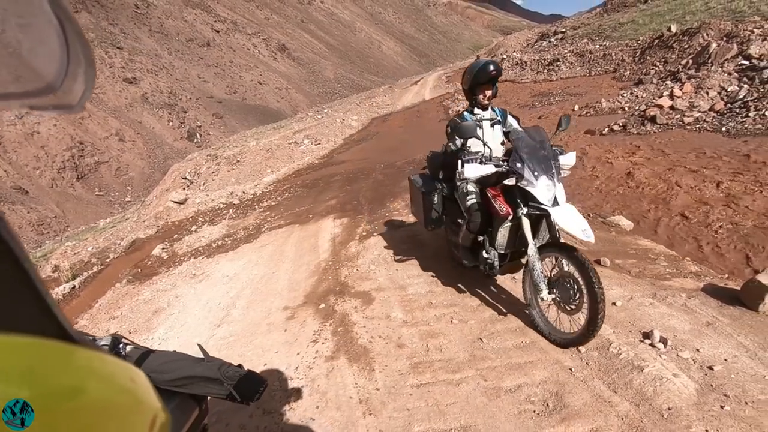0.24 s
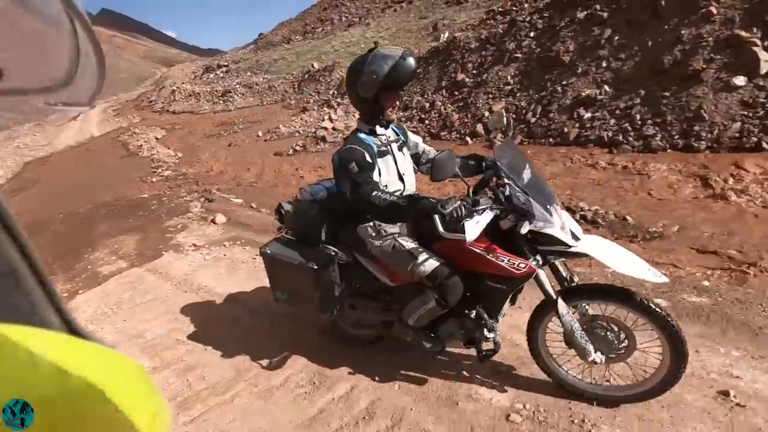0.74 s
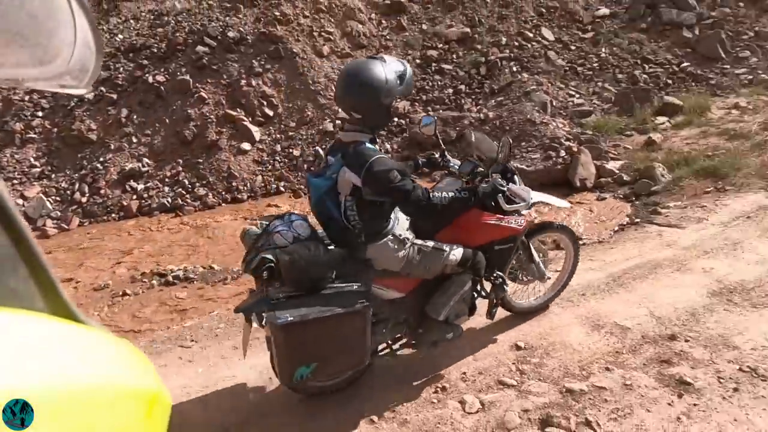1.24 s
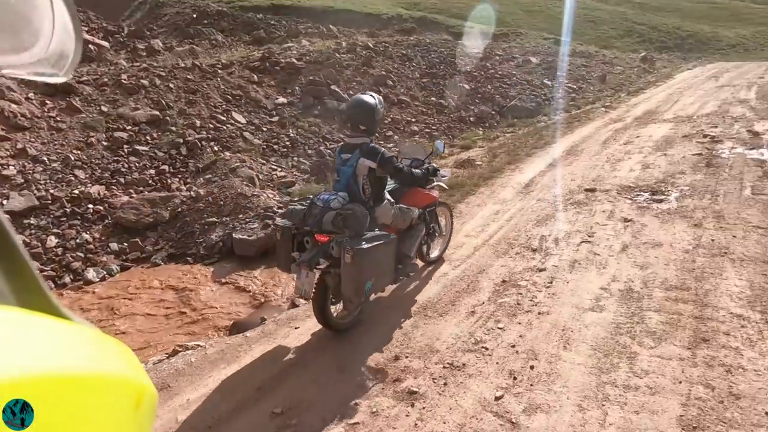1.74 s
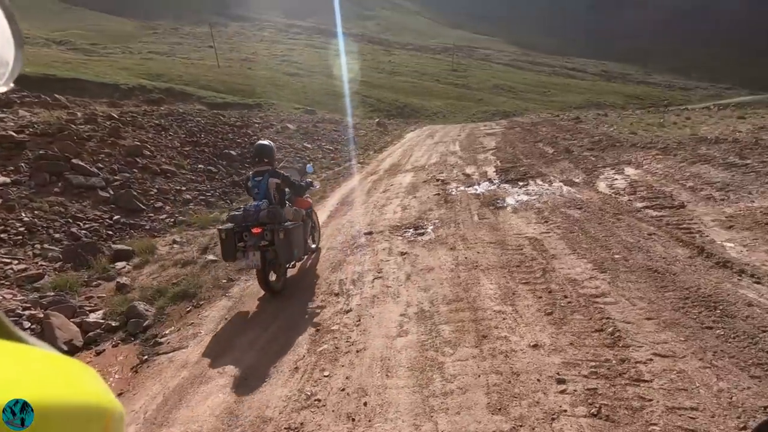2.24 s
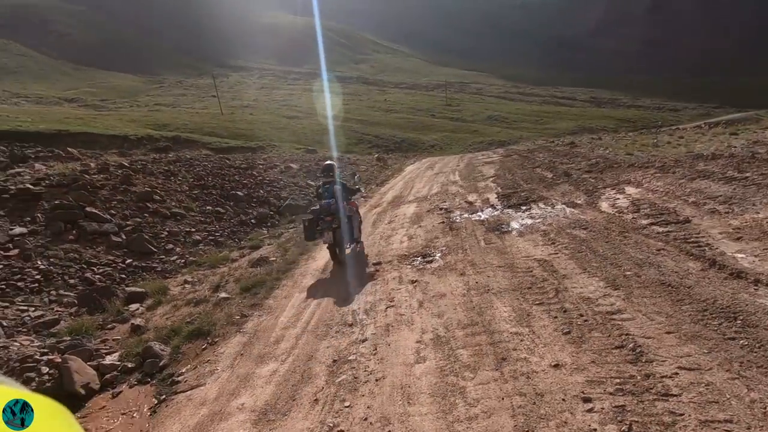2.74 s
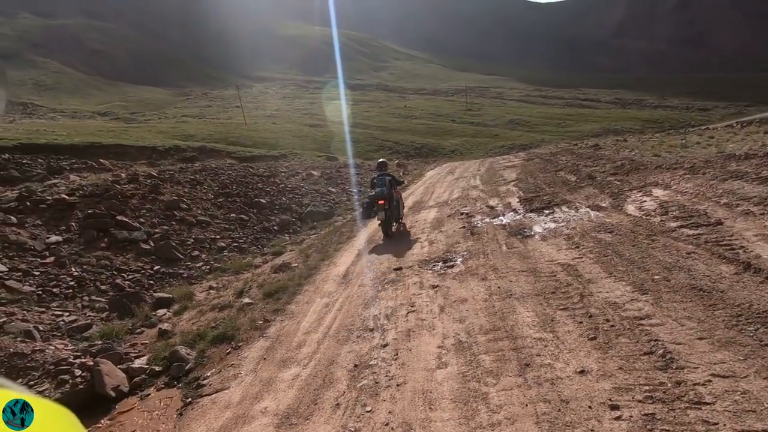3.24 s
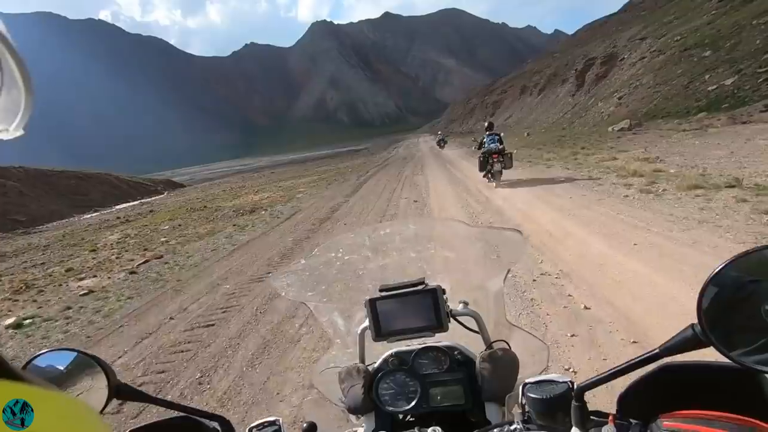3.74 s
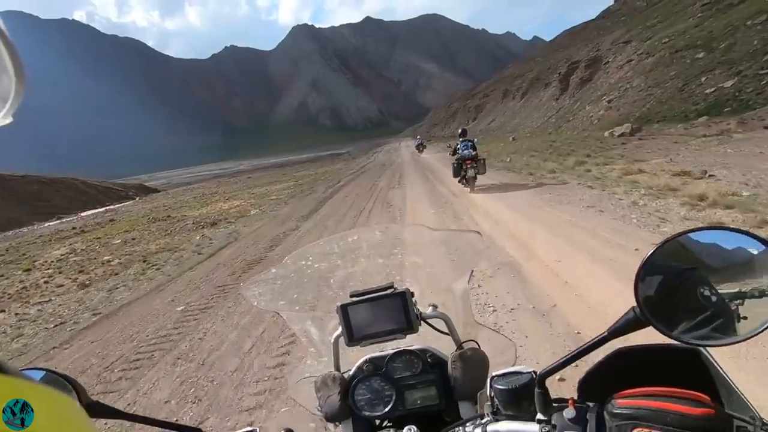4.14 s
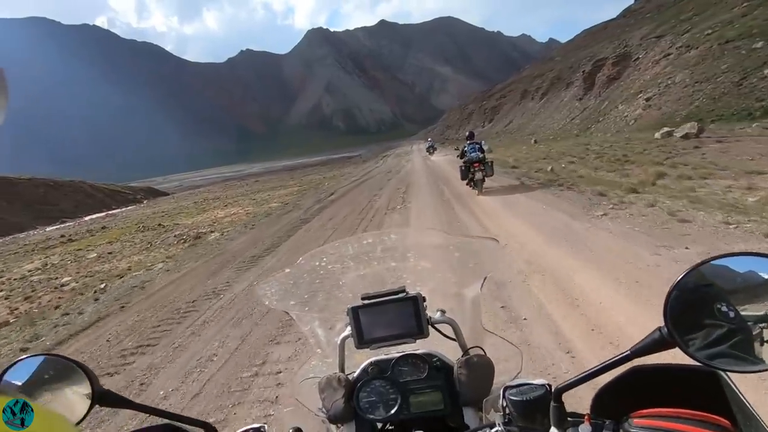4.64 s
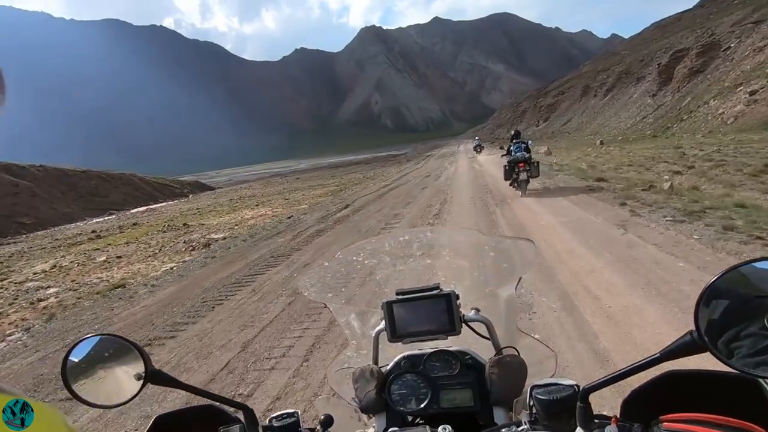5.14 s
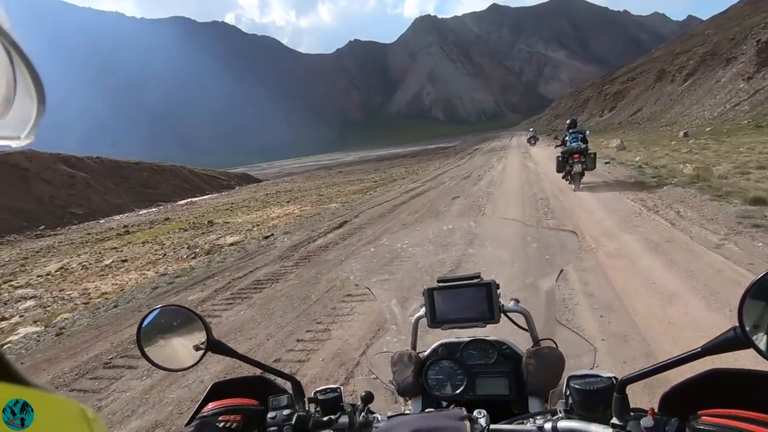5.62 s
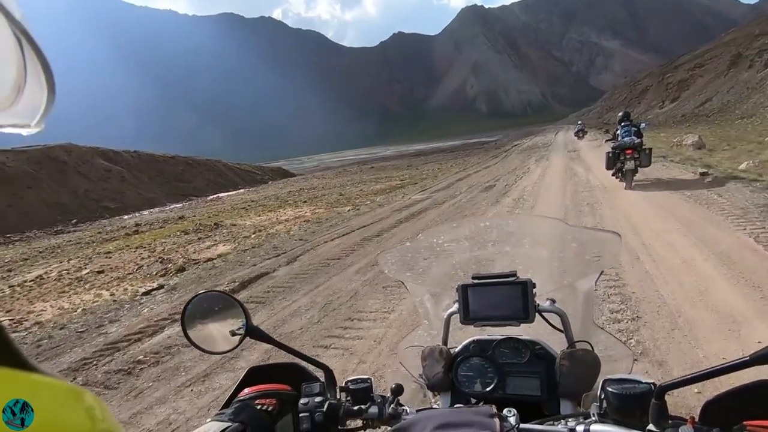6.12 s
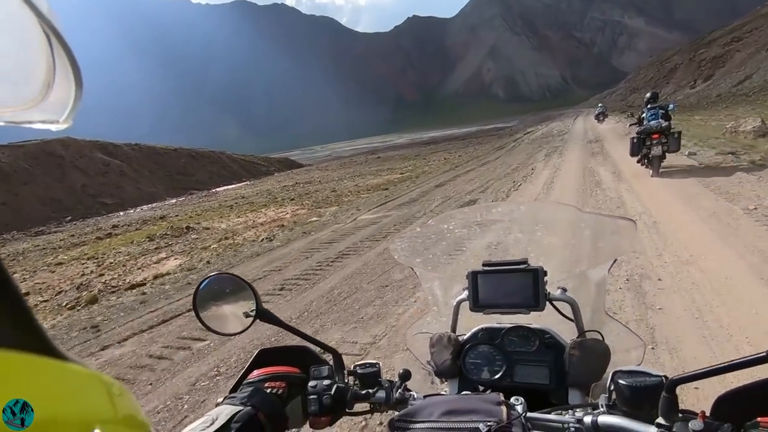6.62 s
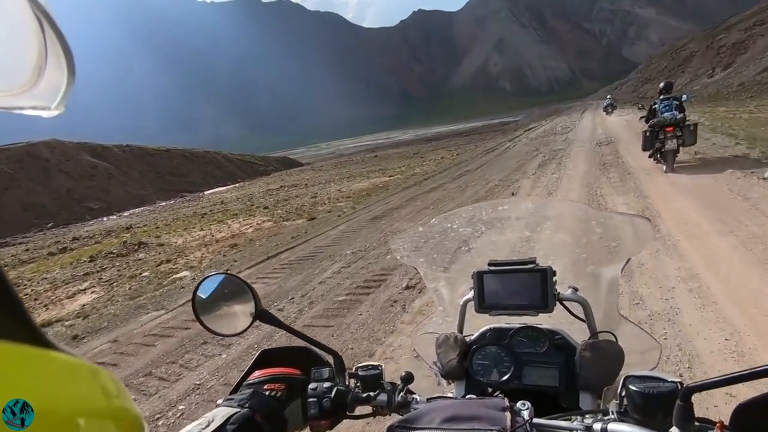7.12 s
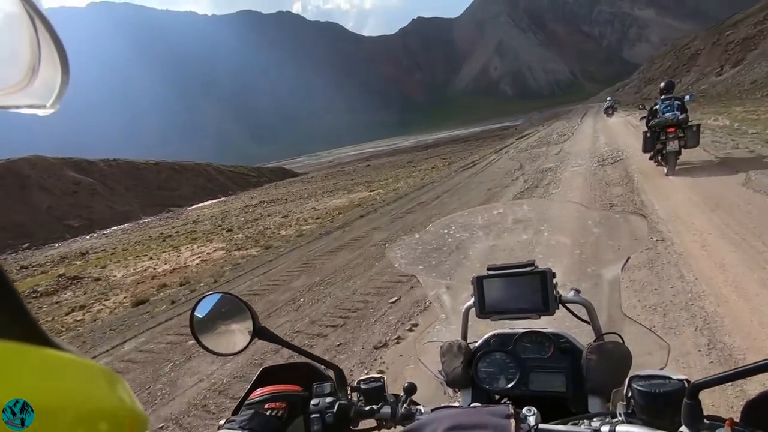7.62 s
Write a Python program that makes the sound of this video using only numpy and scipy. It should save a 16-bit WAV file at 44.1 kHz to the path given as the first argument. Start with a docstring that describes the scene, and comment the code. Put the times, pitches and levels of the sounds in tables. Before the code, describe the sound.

A slow, chugging motorbike passes close by, its valves tapping and chain hissing, then its exhaust spits as it pulls away. Rough helmet rubbing and hollow knocks follow near the microphone. A hard cut brings a steady onboard engine throb with uneven gravel crunch, heavy jolts and ticking fittings, all in open air with low wind buffeting, slightly stronger on the right.

```python
"""A single-cylinder motorcycle thumps past on a dirt track, heard by a helmet camera; the helmet scrapes as the head turns.
Then the camera rides along: its own engine drones, tyres crunch over gravel, the bike knocks and rattles.
Engines are tones and noise bursts timed by an engine cycle; gravel, background roar and wind are uneven noise.
Knocks are short hits that ring or colour noise. Wind buffets the camera throughout."""
import sys
import numpy as np
from scipy import signal
from scipy.fft import rfft, irfft, next_fast_len
from scipy.io import wavfile
from scipy.ndimage import uniform_filter1d, map_coordinates

SR = 44100
rng = np.random.default_rng(int(sys.argv[2]) if len(sys.argv) > 2 else 0)


def output_pcm(signal):
    """Save a mono or channel-first signal as 16-bit PCM at the path in sys.argv[1].

    Samples are clipped to [-1, 1] before scaling.
    """
    pcm = np.clip(np.atleast_2d(signal).T, -1, 1) * 32767
    wavfile.write(sys.argv[1], SR, np.round(pcm).astype(np.int16))


N = 347067

RIDE_S = 3.71  # the ride begins (s)
# The ring of the camera housing, as a colour for hiss. Each row: frequency in Hz, relative level in dB.
HOUSING_COLOUR = [(1750, 8.5), (1960, 14.5), (2250, -3.5), (2950, 5.5), (4300, -12.5), (5900, -7.5),
                  (6550, 2.5), (7200, -12.5), (8500, -23)]
# How stony the track is under the own tyres. Each row: time in seconds, stoniness in dB.
STONINESS = [(3.9, -1), (4.4, 1), (5, 2.5), (5.7, -2.5), (6.4, 2), (6.75, 0), (7.2, 4), (7.87, -1)]


def amp(db):
    """Turn decibels into a gain."""
    return 10 ** (np.asarray(db) / 20)


def unit(x):
    """Scale to an average strength (rms) of 1."""
    return x / np.sqrt(np.mean(x ** 2) + 1e-20)


def clock():
    """Time of each sample in seconds."""
    return np.arange(N) / SR


def along(points, hz):
    """Read (Hz, value) points at any frequency, on a log axis."""
    f, v = np.transpose(points)
    return np.interp(np.log(hz + 1), np.log(f + 1), v)


def shape(points):
    """A filter through (Hz, dB) points that falls steeply beyond both ends."""
    lowest, highest = points[0][0], points[-1][0]

    def response(hz):
        low_cut = np.minimum(1, hz / lowest) ** 4
        high_cut = np.maximum(1, hz / highest) ** 6
        return amp(along(points, hz)) * low_cut / high_cut
    return response


def resonances(modes):
    """A filter that rings at each (Hz, width Hz, dB) mode; neighbours have opposite signs."""
    def response(f):
        total = 0
        for k, (centre, width, db) in enumerate(modes):
            damping = 1j * f * width
            total = total + (-1) ** k * amp(db) * damping / (centre * centre - f * f + damping)
        return total
    return response


def curves(rows):
    """Join timed rows by straight lines into one curve for each column after the time."""
    s, *columns = np.transpose(rows)
    return [np.interp(clock(), s, column) for column in columns]


def wobble(rate):
    """A smooth random curve with this many random points a second."""
    knots = rng.standard_normal(int(N * rate / SR) + 4)
    return map_coordinates(knots, [clock() * rate])


def tone(hz):
    """A sine of rms 1 that follows a pitch curve."""
    return np.sqrt(2) * np.sin(2 * np.pi * np.cumsum(hz) / SR)


def swell(s, length):
    """A flat-topped rise and fall that starts at s."""
    return np.exp(-(2 * (clock() - s) / length - 1) ** 4)


def swells(rows):
    """Add up (start s, length s, dB) swells."""
    return sum(amp(db) * swell(s, length) for s, length, db in rows)


def gate(cycle, at, width):
    """A bell-shaped opening once per engine cycle."""
    return np.exp(-(((cycle - at + .5) % 1 - .5) / width) ** 2)


def gates(cycle, rows):
    """Add up (place in cycle, width in cycles, dB) openings."""
    return sum(amp(db) * gate(cycle, at, width) for at, width, db in rows)


def filtered(x, response):
    """Pass x through a response given by frequency."""
    m = next_fast_len(N + SR // 2)
    return irfft(rfft(x, m) * response(np.fft.rfftfreq(m, 1 / SR)), m)[..., :N]


def port_gains(hz):
    """Left and right response of the microphone ports: the helmet shades and delays the left one."""
    # Left against right. Each row: frequency in Hz, left minus right in dB.
    tilt = [(30, -6.5), (90, -3), (160, -2), (300, -5.5), (700, -3), (1200, -4), (1900, -2), (3000, -5),
            (6500, -11), (8500, -2)]
    lag = 0.00017  # the left port hears later (s)
    # half of the contrast goes to each side
    half = amp(along(tilt, hz) / 2) * np.exp(-1j * np.pi * hz * lag)
    return np.array([half, 1 / half])


def rush(response, drive=1):
    """Stereo noise shaped in time by drive and coloured by response, as strong as its drive."""
    # How alike the two ports hear noise. Each row: frequency in Hz, likeness from 0 to 1.
    alike = [(30, .55), (80, .6), (200, .68), (500, .5), (1200, .83), (2000, .7), (5000, .45)]
    a, b = drive * rng.standard_normal((2, N))
    turn = lambda hz: np.arccos(np.clip(along(alike, hz), 0, 1)) / 2
    common = filtered(a, lambda hz: response(hz) * np.cos(turn(hz)))
    apart = filtered(b, lambda hz: response(hz) * np.sin(turn(hz)))
    pair = filtered(np.array([common + apart, common - apart]), port_gains)
    return unit(pair) * np.sqrt(np.mean(np.square(drive)))


def impulses(rows):
    """One single-sample hit for each (s, dB) row."""
    hits = np.zeros(N)
    for s, db in rows:
        hits[round(s * SR)] = amp(db)
    return hits


def blows(rows, t60):
    """Envelope of (s, dB) hits, each falling 60 dB in t60 seconds after a very quick rise."""
    t = np.arange(SR // 4) / SR
    decay = amp(-60 * t / t60) * (1 - np.exp(-t / 0.000088))
    return signal.fftconvolve(impulses(rows), decay)[:N]


def struck(rows, modes):
    """Clean (s, peak dB) knocks that ring (Hz, width Hz, dB) modes."""
    hz = np.arange(SR // 2 + 1)
    softening = (1 + 1j * hz / modes[-1][0]) ** 2
    ring = irfft(resonances(modes)(hz) / softening)
    knock = signal.fftconvolve(impulses(rows), ring[:SR // 2] / abs(ring).max())[:N]
    return filtered(knock, port_gains)


def riding():
    """0 while standing by the track, 1 on the ride."""
    return np.clip((clock() - RIDE_S) / 0.011 + .5, 0, 1)


def turned(shade_db):
    """Gain while the head is turned away: a brief dip, then a steady change until the ride."""
    turn_s, dip_db, dip_s = 2.93, -4, 0.2
    since = np.maximum(clock() - turn_s, 0)
    change_db = shade_db + dip_db * np.exp(-since / dip_s)
    return amp(change_db * np.minimum(since / 0.005, 1) * (1 - riding()))


def path():
    """The passing bike's bearing (-1 coming, 1 going) and its distance (m) on a straight line."""
    nearest_s, speed_m_per_s, miss_m = 1.238, 5.16, 2.21
    travelled = speed_m_per_s * (clock() - nearest_s)
    distance = np.hypot(travelled, miss_m)
    return travelled / distance, distance


def passing(alongside_db, spreading, rear_db):
    """Level (dB) of one sound of the passing bike, from its distance and the way it points."""
    ahead, distance = path()
    miss_m = 2.21  # its distance when alongside
    return alongside_db + spreading * 20 * np.log10(miss_m / distance) + rear_db * ahead


def passing_bike():
    """One engine cycle times the thump, valves and spits of the passing bike; the chain hisses."""
    # Engine speed. Each row: time in seconds, firings per second.
    firing_rates = [(0.0, 17.44), (0.82, 17.7), (1.01, 18.57), (1.61, 19.18), (2.1, 20.83), (2.8, 21.32)]
    # Chain: relative level in dB alongside, share of the spreading loss, dB gained with the tail to the camera.
    chain_level = (-66.5, 0.73, -3)
    rate, = curves(firing_rates)
    cycle = np.cumsum(rate) / SR
    chain = rush(shape(HOUSING_COLOUR)) * amp(passing(*chain_level))
    centred = filtered(silencer_thump(cycle, rate) + engine_whine(), port_gains)
    bike = centred + valve_clatter(cycle) + pipe_spits(cycle) + chain
    return bike * turned(shade_db=-7.5) * (1 - riding())


def silencer_thump(cycle, rate):
    """Each firing makes the silencer and the pipe swing a few times, a little unevenly."""
    # Silencer notes. Each row: Hz at 19 firings per second, length in cycles at that rate, relative level in dB.
    silencer = [(99, 0.2, 6), (216.4, 0.26, -21)]
    # Thump, then pipe note: relative level in dB alongside, share of the spreading loss,
    # dB gained with the tail to the camera.
    thump_level = (-32, 0.38, 1)
    pipe_level = (-13.5, 2.7, 1)
    ahead, _ = path()
    # the pipe note sinks as the bike goes by; lead and length are in cycles
    pipe_hz, pipe_lead, pipe_length = 292 * (1 - 0.16 * ahead), 0.078, 0.22
    firing = np.round(cycle).astype(int)
    u = cycle - firing  # cycles since the nearest firing
    size, stretch = rng.standard_normal((firing.max() + 1, 2))[firing].T
    swing = u * (1 + .02 * stretch) / 19

    def burst(hz, length, lead=0):
        # faster firing keeps it swinging longer
        width = length * (rate / 19) ** 2.1
        return np.exp(-((u + lead) / width) ** 2) * np.cos(2 * np.pi * hz * swing)

    thump = sum(amp(db) * burst(hz, length) for hz, length, db in silencer)
    thump = thump + amp(passing(*pipe_level)) * burst(pipe_hz, pipe_length, lead=pipe_lead)
    return unit(thump * amp(.5 * size)) * amp(passing(*thump_level))


def valve_clatter(cycle):
    """Valve gear taps several times a cycle: noise through the engine case plus its wavering main note."""
    # Taps in one cycle. Each row: cycles after the firing, width in cycles, relative level in dB.
    taps = [(-0.31, 0.091, -5.5), (-0.14, 0.05, -3.5), (0.03, 0.099, -10), (0.34, 0.11, -8.5)]
    # Notes of the engine case. Each row: frequency in Hz, width in Hz, relative level in dB.
    case_modes = [(1130, 340, -18), (1174, 90, 1), (1997, 50, -16.5)]
    # Clatter, then main note: relative level in dB alongside, share of the spreading loss,
    # dB gained with the tail to the camera.
    clatter_level = (-46.5, 0.94, -2.7)
    note_level = (-43, 3.25, -1.5)
    valves = unit((.18 + gates(cycle, taps)) * amp(.8 * wobble(60)))
    case = lambda hz: resonances(case_modes)(hz) / (1 + (hz / 2300) ** 6) * hz / (hz + 900)
    clatter = rush(case, valves) * amp(passing(*clatter_level))
    note_hz = 1209 + 32.6 * wobble(90)
    note = unit(valves ** 1.55 * tone(note_hz)) * amp(passing(*note_level))
    return clatter + filtered(note, port_gains)


def pipe_spits(cycle):
    """The pipe spits noise twice a firing, with a hollow chuff under each spit."""
    # Spits in one cycle. Each row: cycles after the firing, width in cycles, relative level in dB.
    puffs = [(-0.16, 0.061, 1), (0.034, 0.065, 0)]
    # Colours of the spit and the chuff. Each row: frequency in Hz, relative level in dB.
    spit_colour = [(1900, 2), (2400, -2.5), (3100, 5), (4200, -14.5), (5900, -15.5), (8500, -29.5)]
    chuff_colour = [(240, 13), (520, -7), (1150, -5), (1550, -10), (2000, -2)]
    # Spit, then chuff: relative level in dB alongside, share of the spreading loss,
    # dB gained with the tail to the camera.
    spit_level = (-73, 1.6, 16.4)
    chuff_level = (-61, 0.49, 10)
    # Rasp as the rider opens the throttle and eases off. Each row: time in seconds, gain in dB.
    rasp = [(1.3, 0.5), (1.65, 3.5), (1.85, 1), (2.05, 2), (2.8, 0)]
    rasp_db, = curves(rasp)
    spits = unit(gates(cycle, puffs) * amp(wobble(20)))
    spit = rush(shape(spit_colour), spits) * amp(passing(*spit_level) + rasp_db)
    chuff = rush(shape(chuff_colour), spits) * amp(passing(*chuff_level))
    return spit + chuff


def engine_whine():
    """The engine's thin whine comes and goes: a sine with wavering pitch and strength."""
    # Each row: start in seconds, length in seconds, level in dB before the wavering.
    whines = [(0.2, 0.44, -54.5), (0.674, 0.33, -56), (1.072, 0.097, -50.5), (1.18, 0.13, -56)]
    pitch_hz = 872 + 24 * wobble(110)
    return tone(pitch_hz) * swells(whines) * amp(2.5 * wobble(30))


def own_bike():
    """The crank shakes twice a cycle, the exhaust booms and drones at higher multiples, the valves chatter."""
    # Engine speed. Each row: time in seconds, firings per second.
    engine_speed = [(3.75, 31.1), (4.25, 31.6), (4.65, 33.0), (5.0, 33.2), (5.5, 34.5), (6.3, 34.9),
                    (6.7, 33.9), (7.1, 34.0), (7.87, 33.4)]
    # Exhaust drone. Each row: multiple of the firing rate, relative level in dB.
    drone_orders = [(4, -18), (6, -10.5), (7, -16.5), (8, -19), (10, -23.5), (13, -25), (15, -25.5),
                    (16, -24.5)]
    # Throttle, heard as the drone's gain. Each row: time in seconds, gain in dB.
    throttle = [(3.7, -37), (4.7, -36.5), (5, -35), (5.5, -36.5), (5.9, -42.5), (6.4, -38), (7, -37.5),
                (7.2, -53), (7.87, -40.5)]
    # Bass in the helmet. Each row: time in seconds, crank shake in dB, exhaust boom in dB.
    throb = [(3.75, -38, -36), (4.3, -39.5, -32.5), (4.7, -36.5, -42.5), (4.95, -31.5, -39.5),
             (5.3, -36, -35.5), (5.55, -40.5, -30.5), (5.85, -33.5, -38), (6.15, -41, -36),
             (6.38, -33.5, -39), (6.6, -39.5, -35.5), (7.15, -44, -50), (7.87, -29.5, -44)]
    rate, = curves(engine_speed)
    drone_db, = curves(throttle)
    shake_db, boom_db = curves(throb)
    cycle = np.cumsum(rate * (1 + 0.005 * wobble(10))) / SR

    def order(k):
        # one multiple of the firing rate, slightly unsteady
        phase = k * cycle + 0.045 * wobble(9)
        return np.sqrt(2) * np.cos(2 * np.pi * phase) * amp(1.2 * wobble(8))

    drone = sum(amp(db) * order(k) for k, db in drone_orders)
    tones = amp(shake_db) * order(2) + amp(boom_db) * order(3) + amp(drone_db) * drone
    valves = unit(0.045 + gate(cycle, 0, 0.092) + .5 * gate(cycle, 0.4, 0.049))
    chatter_colour = shape([(200, 9.0), (500, 7.5), (750, -12.0), (1180, -15.0),
                            (1600, -20.0), (2000, -19.5), (2600, -24.5)])
    chatter = amp(-51.5) * rush(chatter_colour, valves)
    return (filtered(tones, port_gains) + chatter) * riding()


def ground_gain(standing_db, riding_db, stony_share):
    """Gain of a roar or hiss: steady while standing, following the stones on the ride."""
    stony_db, = curves(STONINESS)
    return amp(standing_db + riding() * (riding_db + stony_share * stony_db - standing_db))


def background_and_gravel():
    """Uneven noise: steady background roar and hiss while standing; tyres and gravel on the ride."""
    # Colours of the roar and the crunch. Each row: frequency in Hz, relative level in dB.
    roar_colour = [(140, -7), (230, -6), (410, -14), (540, -13), (700, -16), (830, -16.5), (940, -13.5),
                   (1170, -12), (1650, -26.5), (1950, -37.5), (2600, -40.5)]
    crunch_colour = [(900, -27), (1600, 3.5), (1950, 15), (2400, -2.5), (2950, 1), (4000, -14), (5200, -19),
                     (6500, -14.5), (8000, -23), (11000, -34.5)]
    # Roar, crunch, sizzle: dB while standing, dB while riding, dB gained per dB of stoniness.
    roar_level = (-49, -46, 0.45)
    crunch_level = (-60.5, -64.5, 0.89)
    sizzle_level = (-77, -77.5, 0.6)
    roar_drive = amp(1.3 * wobble(45) + .6 * wobble(8))
    roar = rush(shape(roar_colour), roar_drive) * ground_gain(*roar_level)
    crunch_drive = amp(2.2 * wobble(50) + 1.8 * wobble(700))
    crunch = rush(shape(crunch_colour), crunch_drive) * ground_gain(*crunch_level)
    sizzle_drive = amp(1.5 * riding() * wobble(22))
    sizzle = rush(shape(HOUSING_COLOUR), sizzle_drive) * ground_gain(*sizzle_level)
    return (roar + crunch + sizzle) * turned(shade_db=-3.5)


def rattles():
    """(s, dB) of small rattles at random moments of the ride, stronger where the track is stony."""
    per_s, level_db, scatter_db = 12, -73.5, 8
    chance = rng.random((60, 2))
    times = RIDE_S + np.cumsum(.3 + 1.4 * chance[:, 0]) / per_s
    stony_db = np.interp(times, *np.transpose(STONINESS))
    levels = level_db + stony_db + scatter_db * (2 * chance[:, 1] - 1)
    return [(s, db) for s, db in zip(times, levels) if s < (N - 1) / SR]


def bounced(rows):
    """Each (s, dB) tick of a loose fitting and its uneven, weakening bounces."""
    bounce_s, loss_db = 0.015, 6  # mean flight, and mean loss a bounce
    flights = rng.uniform(.4, 1.6, (len(rows), 3))
    contacts = list(rows)
    for (s, db), flight in zip(rows, flights):
        for late in np.cumsum(flight):
            contacts.append((s + bounce_s * late, db - loss_db * late))
    return [(s, db) for s, db in contacts if s < (N - 1) / SR]


def knocks():
    """Low thuds, a few while standing and most on the ride; shoves of the camera; ticks of fittings and stones."""
    # The hardest thuds, then the sharpest ticks. Each row: time in seconds, relative strength in dB.
    thud_rows = [(0.258, -31.5), (2.162, -34.5), (4.558, -28), (4.669, -28), (4.828, -32), (5.018, -27.5),
                 (5.042, -24.5), (5.088, -25.5), (5.234, -27), (6.293, -29), (6.453, -31.5)]
    ticks = [(3.9134, -58), (4.0642, -65.5), (4.1001, -60), (4.15, -59.5), (4.3004, -61), (4.356, -64.5),
             (4.4583, -59), (4.7586, -61.5), (4.9314, -59), (5.02, -64), (5.065, -64.5), (5.3223, -67),
             (5.4276, -63.5), (6.0796, -62), (6.2732, -61.5), (6.325, -62), (6.437, -61.5)]
    # Colours of a thud and a tick. Each row: frequency in Hz, relative level in dB.
    thud_colour = [(50, -8.5), (130, 0), (250, 3.5), (450, -5.5), (750, -18), (1200, -18), (2000, -27.5),
                   (3200, -40)]
    tick_colour = [(1900, -1.5), (2950, 10), (4700, -10.5), (6000, -2.5), (7900, -1.5), (8700, -13.5),
                   (14000, -33)]
    # Gusts and jolts that shove the camera. Each row: start in seconds, length in seconds, relative level in dB.
    shove_rows = [(0.226, 0.14, -31), (2.797, 0.14, -35.5)]
    thuds = rush(shape(thud_colour), blows(thud_rows, t60=0.09)) * amp(-4.0)
    shove_colour = shape([(25, -4.0), (55, 4.5), (100, -6.0), (250, -16.5)])
    shoves = rush(shove_colour, swells(shove_rows)) * amp([[-2], [2]])  # leans further to the right
    contacts = blows(bounced(ticks + rattles()), t60=0.024)
    return thuds + shoves + rush(shape(tick_colour), contacts)


def helmet_rub():
    """The helmet rubs on the collar, rough noise ringing the cavity behind the ports; the jacket swishes."""
    # Rubs. Each row: start in seconds, length in seconds, cavity note in Hz, relative level in dB.
    rubs = [(2.806, 0.13, 1090, -49), (2.858, 0.034, 1150, -44), (3.438, 0.096, 1340, -52.5),
            (3.684, 0.09, 1264, -52)]
    # Swishes as the shoulders turn. Each row: start in seconds, length in seconds, relative level in dB.
    swishes = [(2.952, 0.13, -62), (3.121, 0.29, -63)]
    # Colours of the rub and the cloth. Each row: frequency in Hz, relative level in dB.
    rub_colour = [(200, -7.5), (500, -9), (800, -17), (1350, -14.5), (2200, -18), (5000, -42),
                  (8800, -43.5)]
    cloth_colour = [(900, -13.5), (1200, -0.5), (1550, -8), (2100, 6), (3400, -4), (4500, -20),
                    (12000, -34.5)]
    scrape = np.zeros((2, N))
    for s, length, hz, db in rubs:
        cavity = lambda f: shape(rub_colour)(f) * (1 + 2.2 * abs(resonances([(hz, 110, 0)])(f)))
        scrape += rush(cavity, amp(db + 2.7 * wobble(300)) * swell(s, length))
    swish = rush(shape(cloth_colour), swells(swishes) * amp(2.4 * wobble(350)))
    # the scrape leans less to the right than the other sounds
    return scrape * amp([[1.5], [-1.5]]) + swish


def helmet_shell():
    """The hollow shell is jolted, knocks, cracks and groans; low tones swell and fade. Also sharp clicks, one
    where the scene changes to the ride."""
    # Knocks as the rub begins and ends, then jolts of the helmet, sharp clicks (one as the head turns, one
    # where the scene changes to the ride) and a crisp crack as the rub starts. Each row: time in seconds,
    # strength in dB.
    shell_knocks = [(2.811, -32.5), (2.919, -30), (2.9235, -29), (2.985, -40.5), (3.539, -43)]
    jolts = [(0.27, -23), (0.283, -26.5), (0.33, -25), (2.926, -26)]
    click_rows = [(2.8228, -45), (3.7345, -47)]
    crack_rows = [(2.811, -37)]
    # Hollow ring of the shell, then its padded boom. Each row: frequency in Hz, width in Hz, relative level in dB.
    shell_modes = [(300, 53, 11.5), (556, 160, 1), (1110, 110, -1), (1970, 200, -10), (3500, 770, -33)]
    padding_modes = [(80.4, 45, 3.5), (191, 110, -3), (370, 140, -9)]
    # Colour of a click. Each row: frequency in Hz, relative level in dB.
    click_colour = [(2200, 6), (5000, -6), (8700, -1.5), (12000, -13.5), (15000, -15)]
    # A groan late in the rub: start in seconds, length in seconds, level in dB.
    groan_row = (2.87, 0.05, -44)
    # Low tones as the head turns. Each row: start in seconds, length in seconds, mean pitch in Hz, relative level in dB.
    hum_rows = [(2.811, 0.12, 38.76, -32.5), (2.947, 0.19, 37.7, -42.5)]
    hollow = lambda f: resonances(shell_modes)(f) / (1 + (f / 4500) ** 6)
    groan = rush(hollow, swells([groan_row]))
    body = struck(shell_knocks, shell_modes) + struck(jolts, padding_modes)
    clicks = rush(shape(click_colour), blows(click_rows, t60=0.011))
    crack = rush(shape([(1500, 11), (3700, 2), (5500, -26)]), blows(crack_rows, t60=0.012))
    hums = np.zeros(N)
    for s, length, hz, db in hum_rows:
        hums += amp(db) * swell(s, length) * tone(hz * (1 + 0.02 * wobble(20)))
    return groan + body + clicks + crack + filtered(hums, port_gains)


def wind_buffeting():
    """Lumpy low noise of wind on the ports; its left-right lean drifts and it changes as the head turns."""
    # Wind. Each row: time in seconds, gain in dB, extra left minus right in dB.
    wind_rows = [(0, -33, 1), (.7, -32.5, 0.5), (1.6, -41, 3), (2.2, -36, 2.5), (2.7, -35.5, 0.5),
                 (3.05, -44.5, -9.5), (3.17, -38, -1.5), (3.6, -38, 1), (3.76, -32, 1.5), (4.65, -32, -3),
                 (5.3, -33, -2), (6.1, -31, -1.5), (7.87, -30.5, -3.5)]
    # Its colour. Each row: frequency in Hz, relative level in dB.
    buffet_colour = [(16, -16.5), (26, -7), (42, 1.5), (75, -4), (120, -6), (160, -14), (250, -22),
                     (400, -34)]
    wind_db, lean_db = curves(wind_rows)
    lumps = amp(2.1 * wobble(14))
    lean = np.array([lean_db, -lean_db]) / 2
    return rush(shape(buffet_colour), lumps) * amp(wind_db + lean) * turned(shade_db=3.0)


def scene():
    """Everything that reaches the helmet."""
    bikes = passing_bike() + own_bike()
    surroundings = background_and_gravel() + wind_buffeting()
    return bikes + knocks() + helmet_rub() + helmet_shell() + surroundings


def record(dry):
    """The camera's gain control holds down loud surges; nothing is kept above its band limit."""
    top_hz = 15500
    loudness = np.sqrt(abs(uniform_filter1d(np.mean(dry ** 2, axis=0), size=SR // 25)))
    gain = (1 + (loudness / amp(-24.5)) ** 6) ** (-1 / 6)
    fade_in = np.minimum(clock() / .003, 1)
    return filtered(dry * gain * fade_in, lambda hz: hz < top_hz)


dry = scene()
out = record(dry)
output_pcm(out)
```